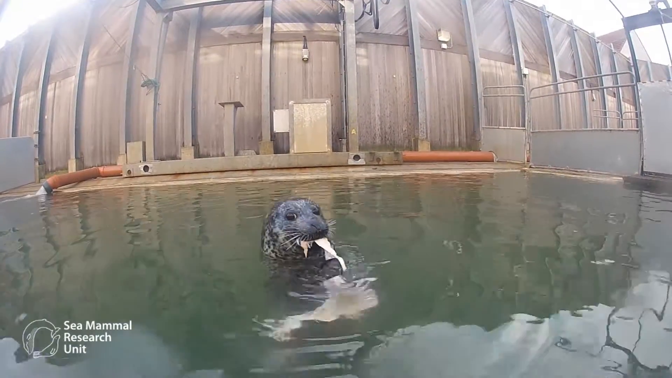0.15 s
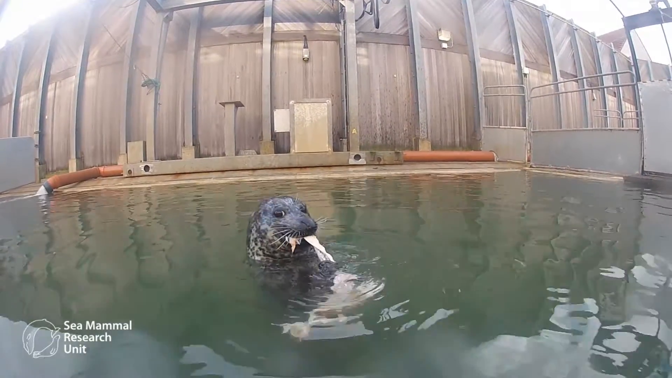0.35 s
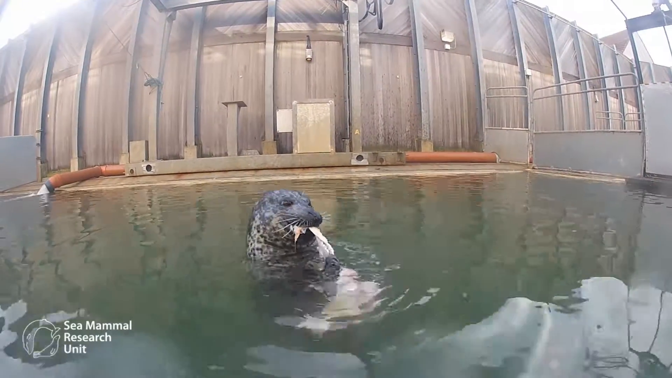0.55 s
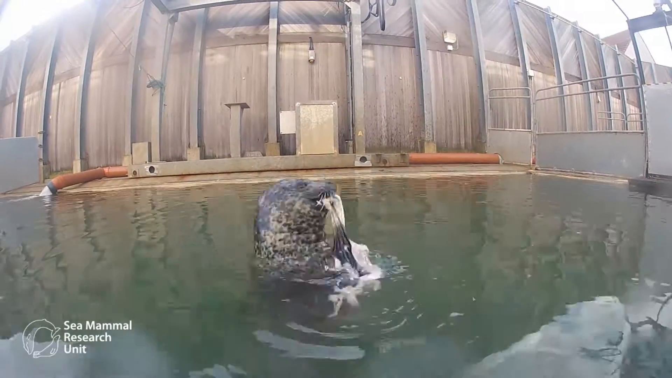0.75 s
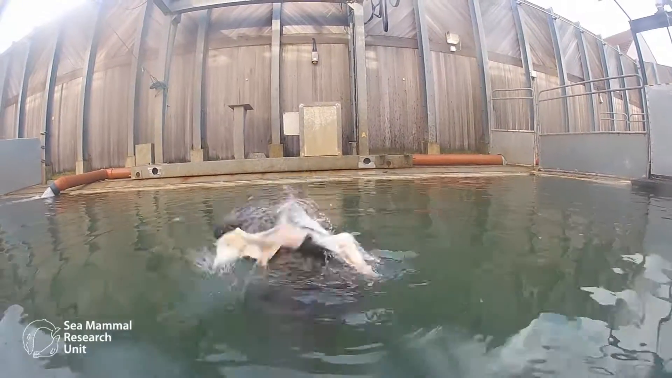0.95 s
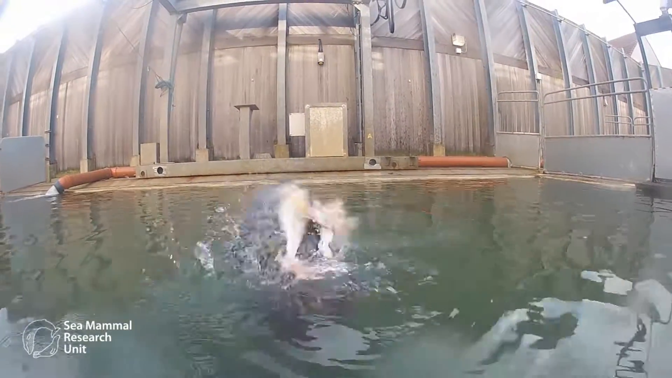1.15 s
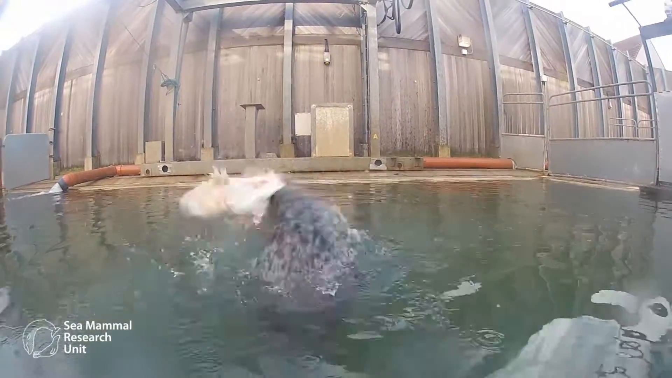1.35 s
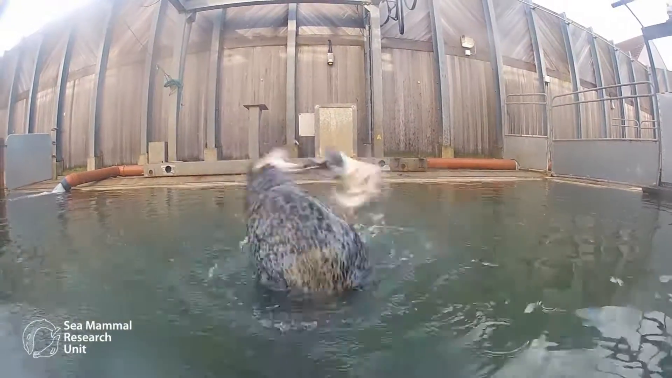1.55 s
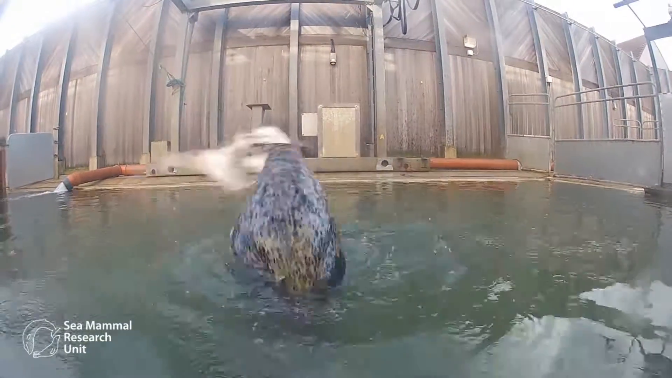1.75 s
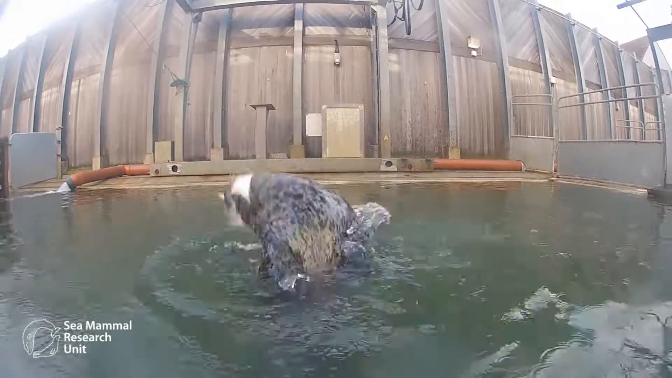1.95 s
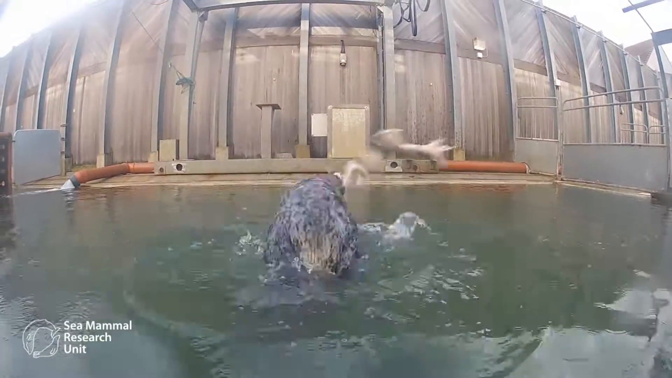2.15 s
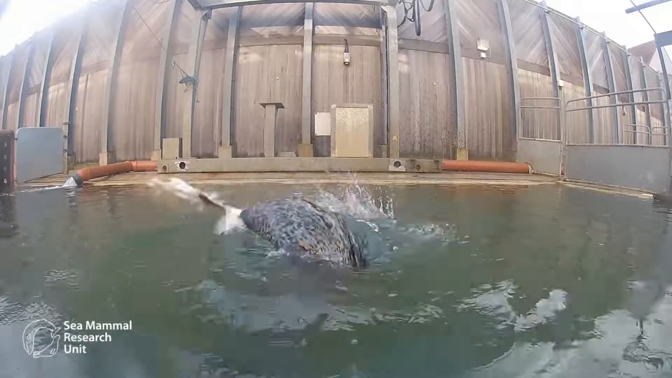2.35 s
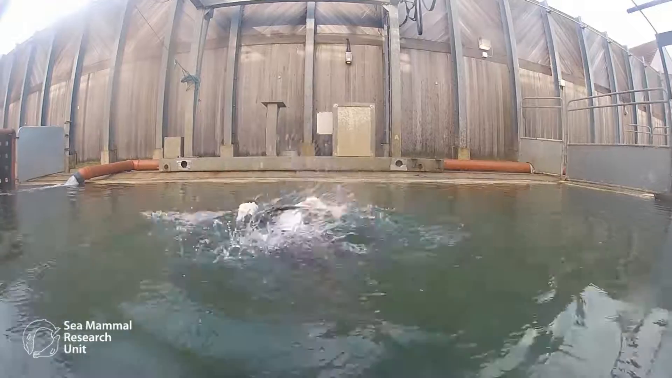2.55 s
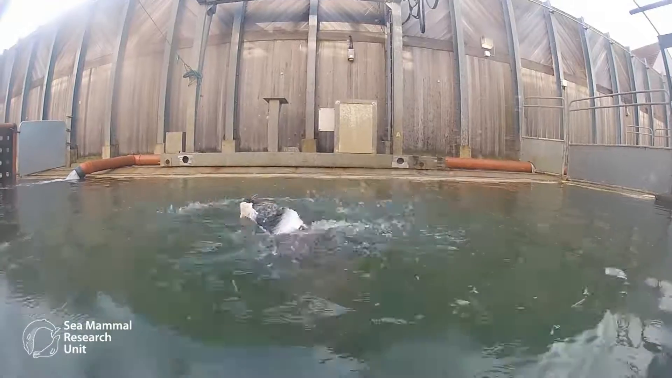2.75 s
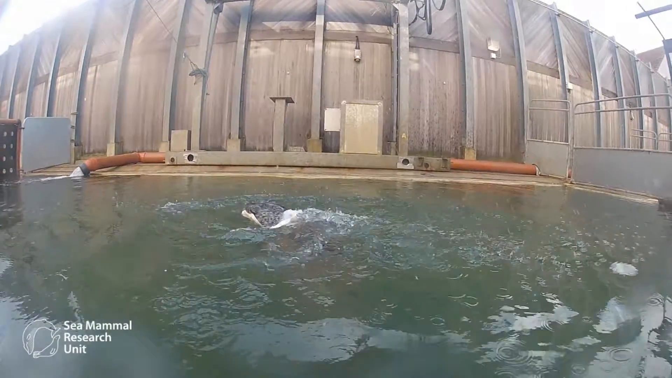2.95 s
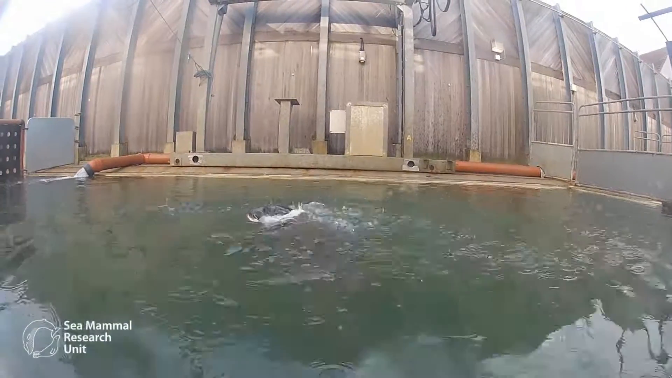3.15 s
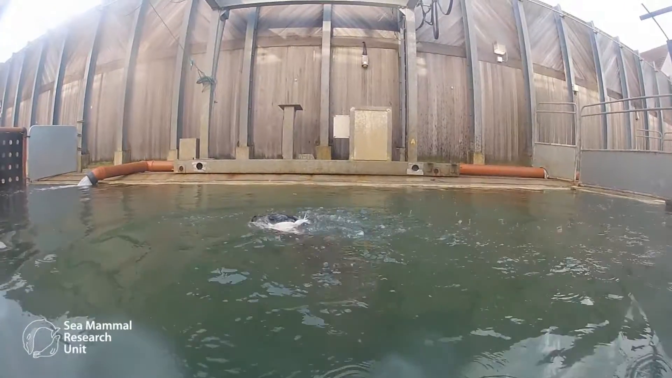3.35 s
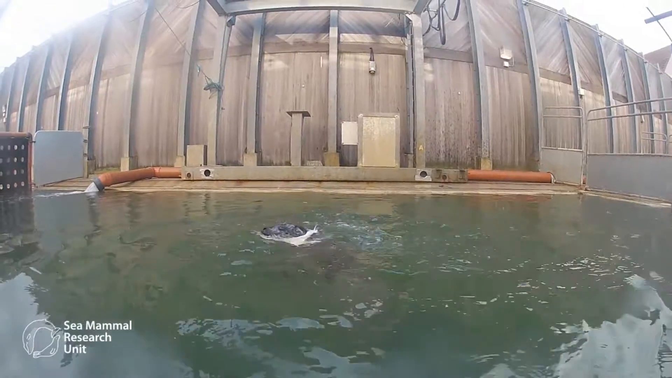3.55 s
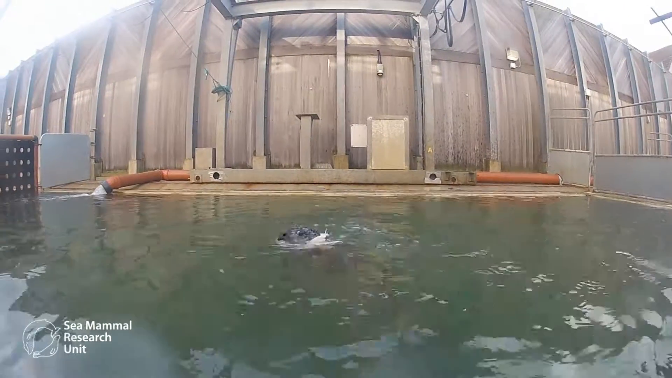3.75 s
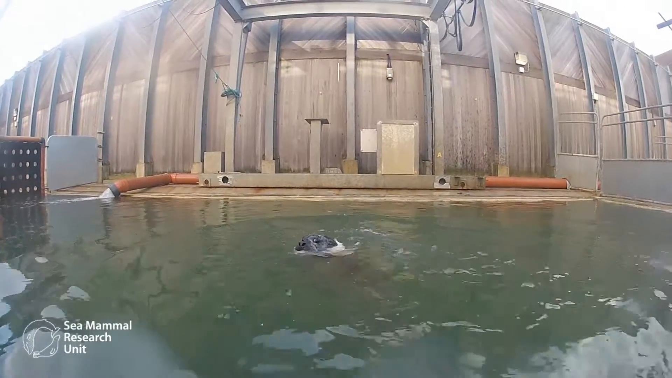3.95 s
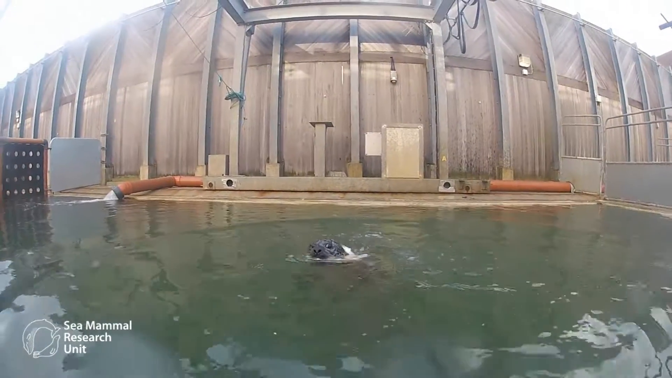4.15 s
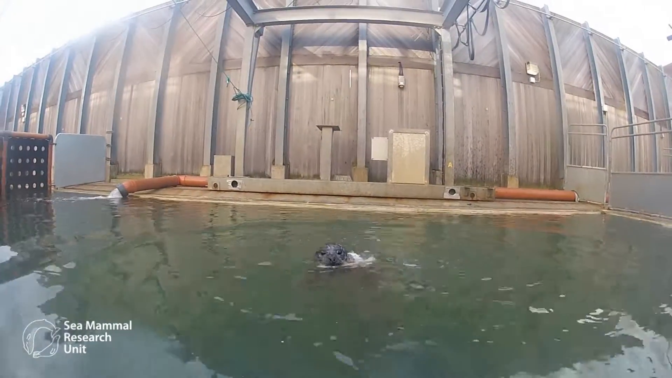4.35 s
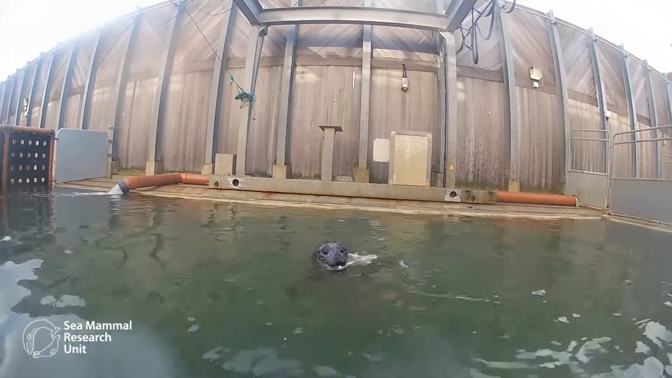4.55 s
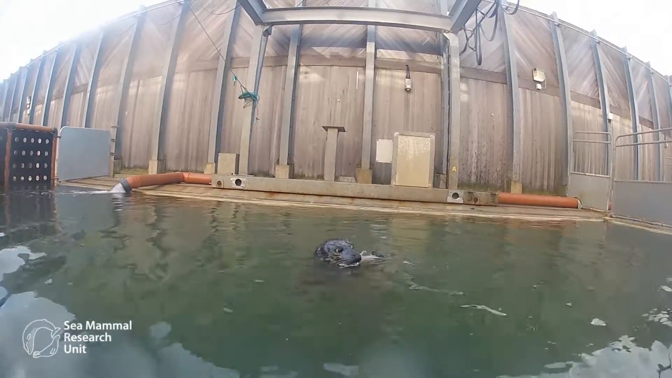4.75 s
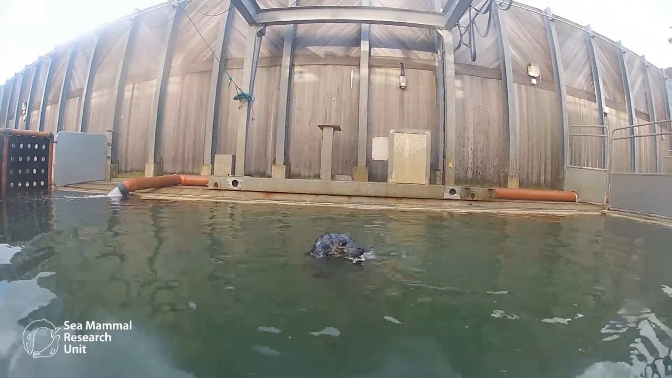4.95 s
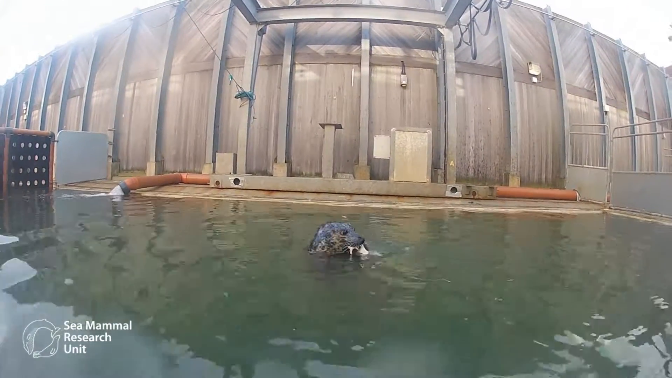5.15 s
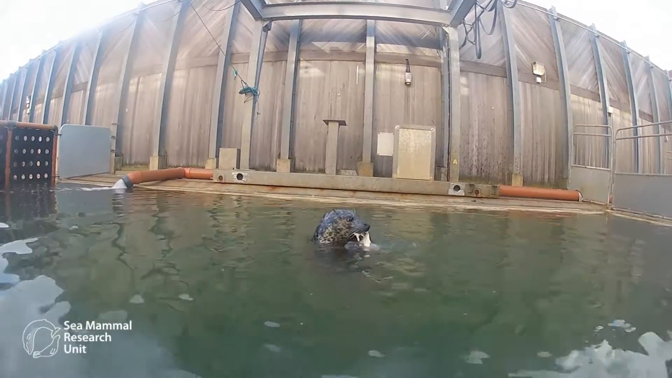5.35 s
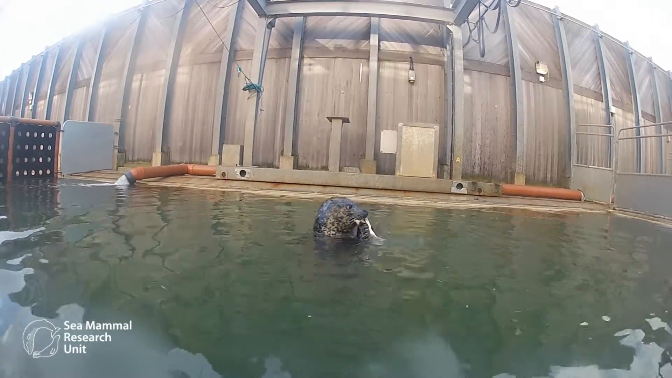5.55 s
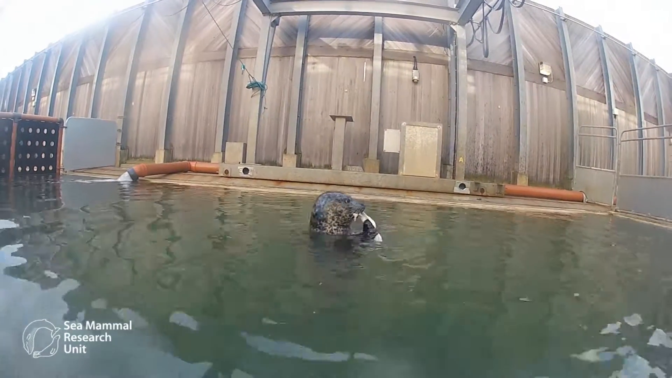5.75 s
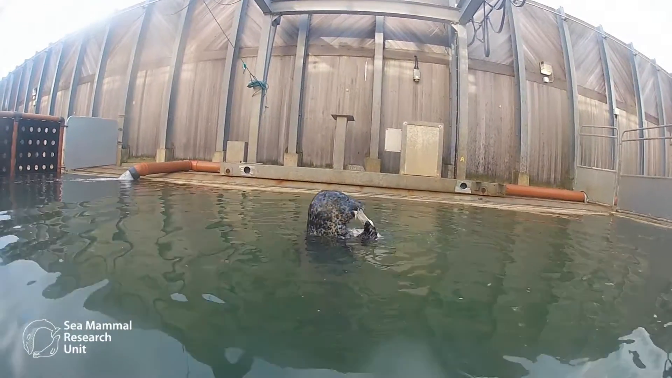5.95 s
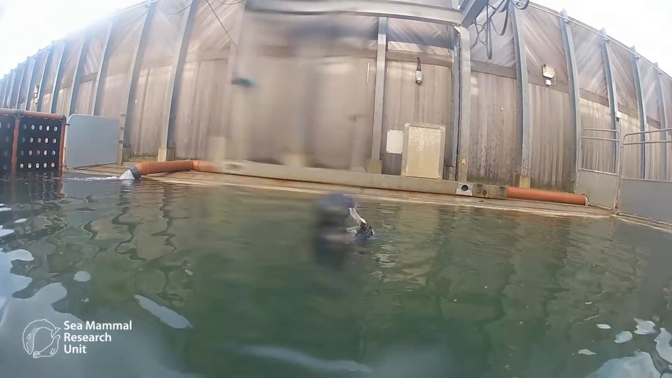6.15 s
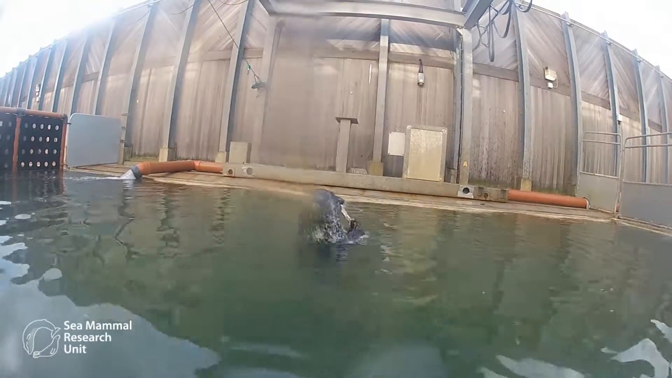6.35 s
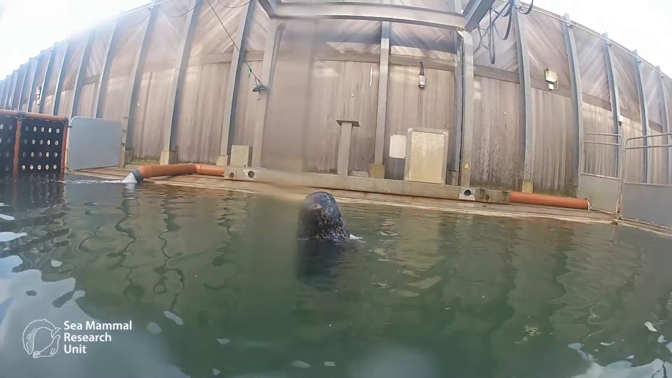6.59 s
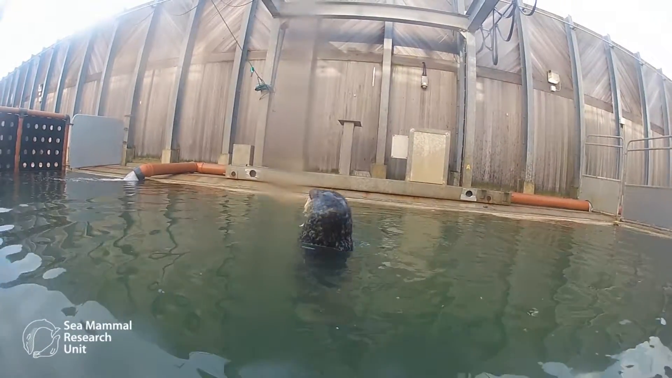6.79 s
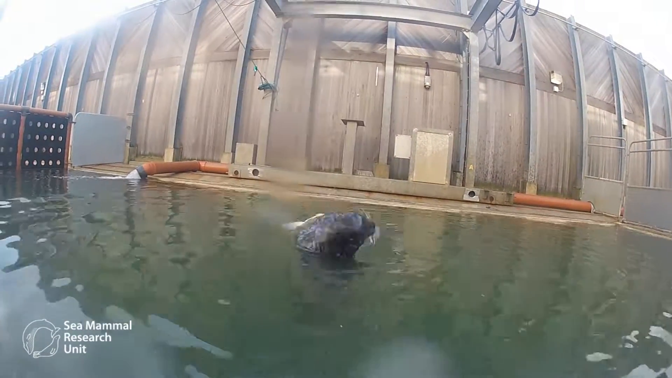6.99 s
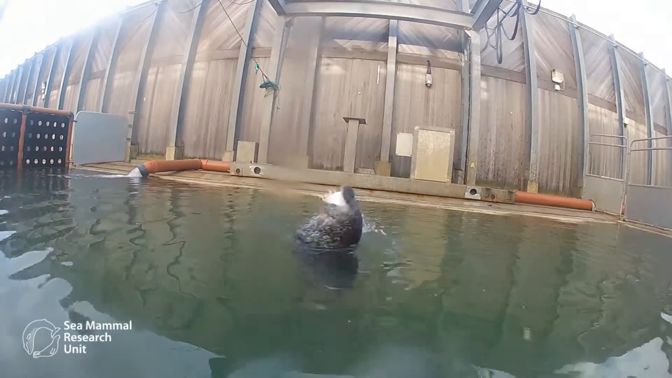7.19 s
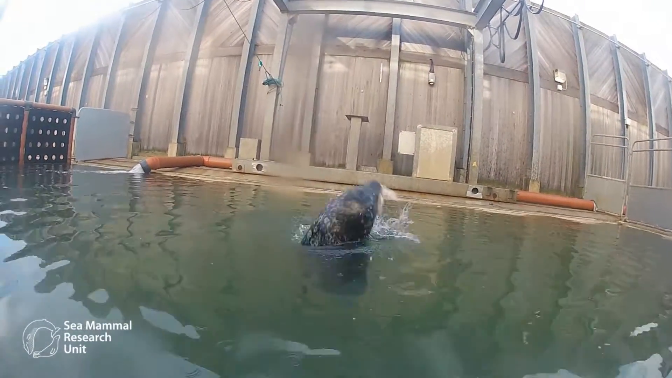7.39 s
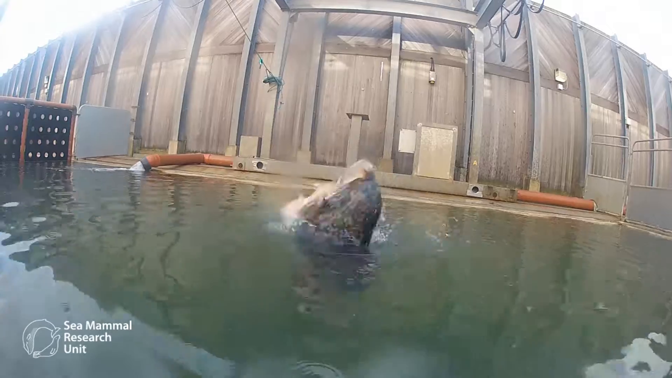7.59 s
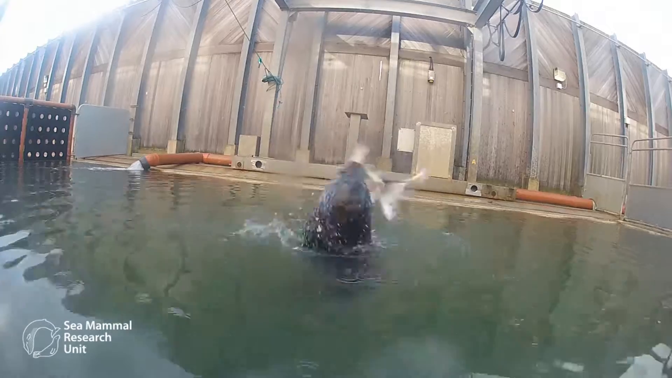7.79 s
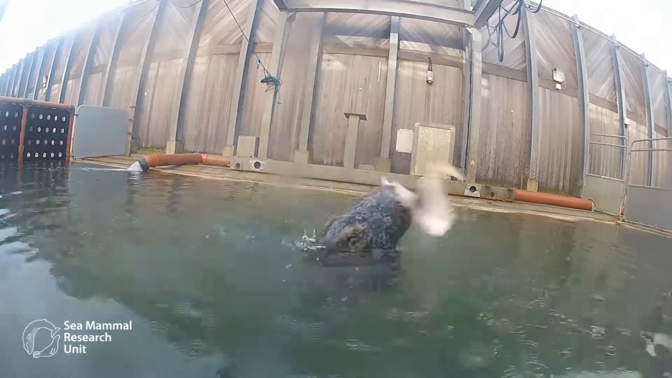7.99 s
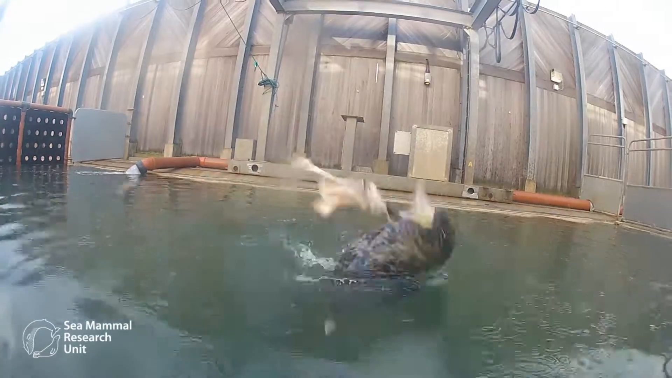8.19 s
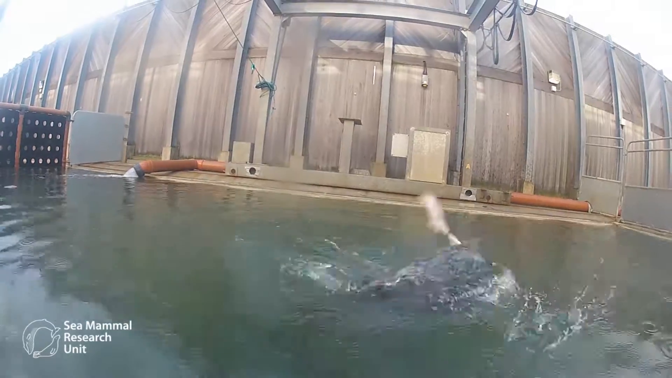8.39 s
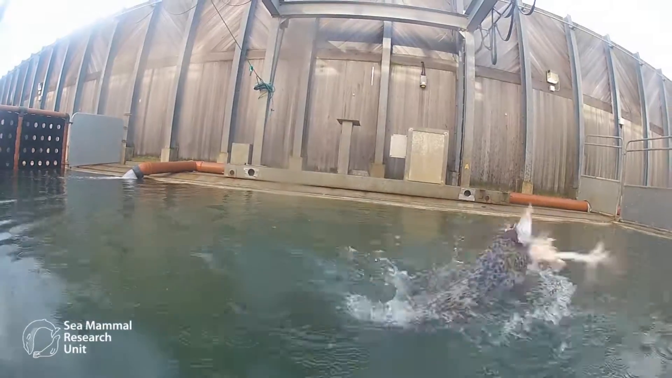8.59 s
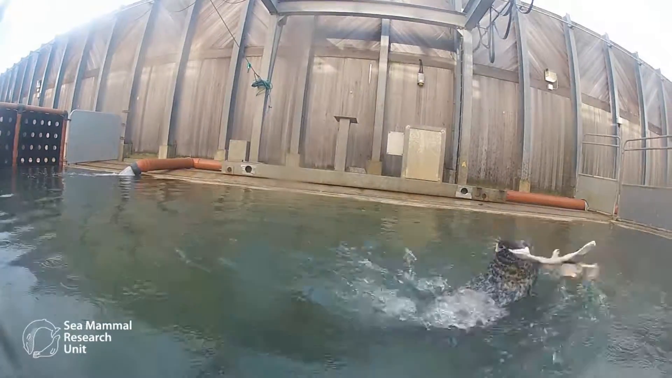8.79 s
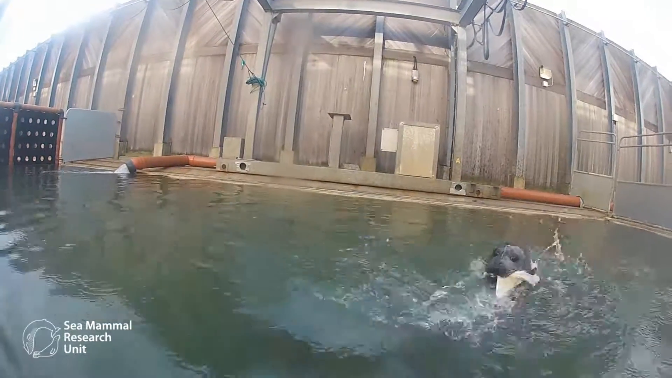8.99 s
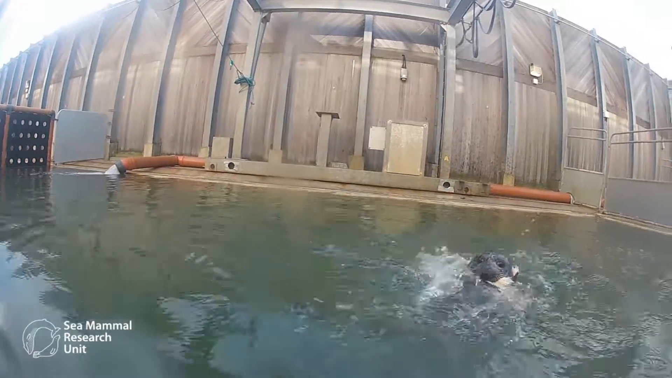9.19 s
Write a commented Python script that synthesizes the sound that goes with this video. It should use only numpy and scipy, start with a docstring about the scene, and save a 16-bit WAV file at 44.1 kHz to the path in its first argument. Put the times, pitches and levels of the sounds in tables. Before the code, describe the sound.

A seal thrashes a fish in an outdoor pool, splashing and gurgling in two bouts, with a trickling inlet, soft thumps and distant gulls.

```python
"""A seal thrashes a fish about in an outdoor pool, heard through a waterproof case just over the water.
Thrashing is swarms of spray ticks and ringing bubbles; gushes and slaps are shaped bursts of spray.
Flung drops rap the case modes; the mount shakes and thumps on one low resonance.
An inlet trickles on as filtered ticks; gulls and a small bird call far off as gliding harmonic tones.
The recorder holds its samples at a low rate, which adds mirrored treble."""
import sys
import numpy as np
from scipy import signal
from scipy.fft import rfft, irfft, next_fast_len
from scipy.io import wavfile
from scipy.ndimage import uniform_filter1d

SR = 44100
rng = np.random.default_rng(int(sys.argv[2]) if len(sys.argv) > 2 else 0)


def dump_mix(stems):
    """Bounce the given channels to the path in sys.argv[1] as a 16-bit WAV at rate SR."""
    frames = np.atleast_2d(stems).T  # one column per channel
    limited = np.clip(frames, -1, 1)  # hard clip at full scale
    pcm = np.round(limited * 32767).astype(np.int16)
    wavfile.write(sys.argv[1], SR, pcm)


N = 407043
T = np.arange(N) / SR


def undb(db):
    """Decibels to amplitude gain."""
    return 10 ** (np.asarray(db) / 20)


def unit(x):
    """Scale to rms 1."""
    return x / np.sqrt(np.mean(x ** 2) + 1e-20)


def add(out, start_s, x):
    """Mix x into out from start_s."""
    i = max(int(start_s * SR), 0)
    out[i:i + len(x)] += x[:max(N - i, 0)]


def colour(x, points, size=2048):
    """Causal minimum-phase filter with the given (frequency [Hz], gain [dB]) outline."""
    hz, db = np.transpose(points)
    gain = undb(np.interp(np.log(np.fft.rfftfreq(size, 1 / SR) + 1), np.log(hz), db))
    # folding the cepstrum gives minimum phase
    cepstrum = irfft(np.log(gain))
    cepstrum[1:size // 2] *= 2
    cepstrum[size // 2 + 1:] = 0
    impulse = irfft(np.exp(rfft(cepstrum)))
    return signal.fftconvolve(x, impulse)[:len(x)]


def band(x, hz, q):
    """One resonance, gain 1 at its centre."""
    b, a = signal.iirpeak(min(hz, SR / 4), max(q, .3), fs=SR)
    return signal.lfilter(b, a, x)


def walk(rate_hz):
    """Slow random curve with a spread near 1: held noise, smoothed twice."""
    k = int(SR / rate_hz)
    steps = np.repeat(rng.standard_normal(N // k + 1), k)
    return np.sqrt(2) * uniform_filter1d(uniform_filter1d(steps, k), k)[:N]


def ticks(size, rate_hz, spread_db):
    """Droplet impacts at random moments: many small, a few large."""
    hit = rng.random(size) < rate_hz / SR
    sign = rng.choice([-1, 1], size)
    return hit * sign * undb(spread_db * np.minimum(rng.exponential(size=size), 4))


def bubbles(low_hz, high_hz, cycles, spread_db, count):
    """Bubbles ring for some cycles and rise in pitch as they near the surface."""
    out = np.zeros(N)
    for when, pitch, life, rank in rng.random((count, 4)):
        hz = low_hz * (high_hz / low_hz) ** pitch
        length_s = cycles * (.5 + life) / hz
        age = np.arange(int(length_s * SR)) / (length_s * SR)
        phase = 2 * np.pi * hz * length_s * (age + 0.172 * age ** 2)
        ring = np.sin(phase) * np.exp(-np.log(100) * age)
        add(out, when * N / SR, ring * undb(spread_db * min(-np.log(1 - rank), 3)))
    return unit(out)


def echo(x, db, t60_s):
    """The walls round the pool return a soft wash: decaying noise, 18 ms late."""
    t = T[:SR]
    tail = rng.standard_normal(len(t)) * np.exp(-np.log(1000) * t / t60_s) * (t > .018)
    return undb(db) * signal.fftconvolve(x, tail / np.linalg.norm(tail))[:N]


# airborne transmission of the case wall: (frequency [Hz], gain [dB])
WALL_RESPONSE = [(200, -5.5), (720, -8.5), (1070, -2), (1400, -10), (1640, -0.5), (2020, -1), (2220, -5),
                 (2430, 2.5), (2850, -2), (3350, -0.5), (3780, 4.5), (4120, -7.5), (4900, -5),
                 (5900, -10.5)]


def through_wall(x):
    """The case wall passes airborne sound unevenly, with peaks and dips."""
    return colour(x, WALL_RESPONSE)


# spectrum of the faint noise that differs between the ears: (frequency [Hz], relative density [dB])
WIDTH_SPECTRUM = [(15, -25), (25, 0), (261, 2.5), (1420, -15.5), (2180, -33.5), (2440, -32.5),
                  (2990, -32.5), (3580, -37.5), (4390, -13.5), (5500, -17), (7150, -57.5), (12100, -120)]


def width():
    """Faint shaped noise, added to one ear and subtracted from the other."""
    return undb(-81) * unit(colour(rng.standard_normal(N), WIDTH_SPECTRUM))


# spectrum of the dull background: (frequency [Hz], relative density [dB])
RUMBLE_SPECTRUM = [(20, -3.5), (35, -2), (60, -2.5), (120, -7.5), (200, -9), (320, -11.5), (500, -17),
                   (800, -23.5), (1500, -45.5)]


def rumble():
    """Low shaped noise whose level drifts a little."""
    noise = unit(colour(rng.standard_normal(N), RUMBLE_SPECTRUM))
    return undb(-59) * noise * undb(0.48 * walk(6))


def calls(notes, harmonics_db):
    """Gliding harmonic notes with a slight random waver in pitch."""
    out = np.zeros(N)
    for start_s, length_s, start_hz, end_hz, db in notes:
        size = int(length_s * SR)
        waver = 0.031 * uniform_filter1d(rng.standard_normal(size), SR // 200)
        hz = np.linspace(start_hz, end_hz, size) * (1 + waver)
        phase = 2 * np.pi * np.cumsum(hz) / SR
        tone = sum(undb(h) * np.sin((k + 1) * phase) for k, h in enumerate(harmonics_db))
        add(out, start_s, undb(db) * unit(tone) * signal.windows.tukey(size, .5))
    return out


# far gull notes: (start [s], length [s], start pitch [Hz], end pitch [Hz], level before wall [dB])
GULL_NOTES = [(.56, 0.074, 1179, 1173, -64.5), (2.86, 0.057, 1192, 1207, -62.5),
              (2.92, 0.058, 1400, 1352, -56), (3.585, 0.0607, 1101, 1163, -61),
              (3.655, 0.0847, 1336, 1356, -52.5), (4.53, 0.0535, 1253, 1303, -63)]


def gulls():
    """Lone gull notes with three harmonics, through the case wall."""
    return through_wall(calls(GULL_NOTES, [-3, -2, -6]))


# each gap is two QUICKEN steps shorter than the last
CACKLE_START_S, CACKLE_GAP_S, CACKLE_QUICKEN_S = 6.06, .122, 0.0027
CACKLE_NOTE_S, CACKLE_HZ, CACKLE_DB, CACKLE_BRIGHTEN_DB = 0.0478, 553.5, -62.5, 2


def cackle():
    """Six like gull notes, ever closer; the third harmonic grows from note to note."""
    out = np.zeros(N)
    for k in range(6):
        start_s = CACKLE_START_S + k * (CACKLE_GAP_S - k * CACKLE_QUICKEN_S)
        note = (start_s, CACKLE_NOTE_S, CACKLE_HZ, CACKLE_HZ, CACKLE_DB)
        out += calls([note], [-12, 0, -11 + k * CACKLE_BRIGHTEN_DB])
    return through_wall(out)


WHISTLE_S, WHISTLE_SAG_HZ = .085, 55
# thin whistles of a small bird: (start [s], start pitch [Hz], level [dB])
WHISTLE_NOTES = [(.76, 4900, -72.5), (3.41, 4760, -71), (4.88, 4750, -74.5), (5.02, 4720, -70),
                 (6.159, 4710, -67.5), (6.33, 4630, -71.5)]


def whistles():
    """Equally long pure tones that sag a little in pitch."""
    notes = [(s, WHISTLE_S, hz, hz - WHISTLE_SAG_HZ, db) for s, hz, db in WHISTLE_NOTES]
    return calls(notes, [0])


def birds():
    """Gulls and a small whistler far off, trailing echoes."""
    song = gulls() + cackle() + whistles()
    return song + echo(song, -4.5, 0.49)


def inlet():
    """Steady trickle: dense droplet ticks through one broad resonance."""
    return undb(-62.0) * unit(through_wall(band(ticks(N, 9000, 1.5), 1950, 0.734)))


SHAKE_DB = -60.5
# spells of harder shaking: (middle [s], half length to 1/e power [s], level [dB])
SHAKE_SPELLS = [(3.2, 0.536, -60), (5.1, 0.54, -54.5), (9.047, 0.13, -55.5)]


def shake():
    """The mount always trembles at its low resonance, harder in spells; powers add."""
    tremble = unit(band(band(rng.standard_normal(N), 78.5, 3.9), 76.66, 2.98))
    power = undb(SHAKE_DB) ** 2
    for middle_s, half_s, db in SHAKE_SPELLS:
        power = power + undb(db) ** 2 * np.exp(-((T - middle_s) / half_s) ** 2)
    return tremble * np.sqrt(power)


THUMP_HZ, THUMP_RISE_S, THUMP_TRIM_DB = 79.95, 0.02154, -4.0
# soft knocks through the mount: (start [s], level before trim [dB])
MOUNT_THUMPS = [(.203, -39.5), (2.991, -42), (3.931, -38), (4.941, -37), (5.445, -42), (5.788, -41.5),
                (6.803, -42.5), (8.784, -38), (9.026, -35)]


def thumps():
    """A nudged mount booms: a low sine that swells and dies away."""
    out, t = np.zeros(N), T[:SR // 3]
    age = t / THUMP_RISE_S
    boom = age ** 2 * np.exp(2 * (1 - age)) * np.sin(2 * np.pi * THUMP_HZ * t)
    for start_s, db in MOUNT_THUMPS:
        add(out, start_s, undb(db + THUMP_TRIM_DB) * boom)
    return out


RAP_TRIM_DB = -19
# modes of the struck case: (nominal frequency [Hz], nominal level [dB], t60 [s])
STRUCK_MODES = [(191, -11, 0.00984), (454, -13.5, 0.00504), (894.6, -2, 0.0177), (1027, -2.5, 0.0326),
                (1222, -4, 0.0104), (1594.7, -0.5, 0.01554), (1751, 3.5, 0.00835), (2027, 0, 0.0189),
                (2350, -5, 0.0106), (2413, -4.5, 0.024), (3346, -4, 0.006), (3540, 3, 0.0117),
                (3690, -3.5, 0.0184), (5020, -6, 0.0089), (5270, -3, 0.0044)]
# drops landing on the case; weight drives the low modes:
# (time [s], level before trim [dB], favoured frequency [Hz], weight [dB])
CASE_RAPS = [(1.7628, -32.5, 1966, 1), (1.773, -37.5, 1666, 5), (1.8499, -34, 1990, -6.5),
             (2.2713, -32.5, 1910, 1), (3.892, -39, 1790, -7.5), (8.0155, -30.5, 2080, -0.5),
             (8.197, -38, 2060, 2.5), (8.254, -34, 1600, 12), (8.3138, -35.5, 1620, 18),
             (8.3989, -17.5, 1951, 0), (8.4073, -17, 2950, -5.5), (8.434, -28, 2000, 2.5),
             (8.6949, -15.5, 1934, 3), (8.705, -18, 2400, 4), (8.7158, -8, 1603, -4.5)]


def raps():
    """A drop strikes the case, then spreads for a moment; where it lands decides which modes speak."""
    out, t = np.zeros(N), T[:SR // 25]
    hz, mode_db, t60_s = np.transpose(STRUCK_MODES)[:, :, None]
    # neighbouring modes swing in opposite directions, so the rap takes a moment to build
    sign = (-1) ** np.arange(len(hz))[:, None]
    for start_s, db, centre_hz, weight_db in CASE_RAPS:
        level_chance, pitch_chance = rng.standard_normal((2, len(hz), 1))
        favoured_db = 9.96 * np.exp(-(np.log2(hz / centre_hz) / 0.212) ** 2)
        low_db = weight_db / (1 + (hz / 1300) ** 8)
        gain = sign * undb(mode_db + 1.48 * level_chance + favoured_db + low_db)
        swing = np.sin(2 * np.pi * hz * (1 + 0.0072 * pitch_chance) * t)
        ring = (gain * swing * np.exp(-np.log(1000) * t / t60_s)).sum(0)
        # first contact: one sharp snap
        snap = np.sin(2 * np.pi * 2600 * t) * np.exp(-t / 0.000084)
        # the spreading edge crackles for a few milliseconds
        splat = band(rng.standard_normal(len(t)) * np.exp(-(t / .0034) ** 2), 2400, .55)
        contact = through_wall(undb(-0.5) * unit(splat) + unit(snap))
        rap = unit(unit(ring) + undb(-3.5) * unit(contact))
        add(out, start_s, undb(db + RAP_TRIM_DB) * rap)
    return out


PLOP_S, PLOP_TRIM_DB = 0.0326, 8.5
# large bubbles that stand out: (start [s], level before trim [dB], start pitch [Hz])
LARGE_PLOPS = [(.789, -64, 1000), (.841, -62, 1036), (1.07, -58, 807), (1.18, -60.5, 1029),
               (1.476, -55, 1014), (2.248, -56, 760), (2.741, -61, 1045), (2.822, -61.5, 1062),
               (3.068, -60.5, 1063), (7.524, -64, 968), (7.729, -50, 989), (9.065, -57, 974)]


def plops():
    """A pocket of trapped air swells, rings and rises in pitch with a wobble."""
    out = np.zeros(N)
    age = np.linspace(0, 1, int(PLOP_S * SR))
    envelope = (age / 0.164) * np.exp(1 - age / 0.1384) * (1 - age ** 4)
    for start_s, db, hz in LARGE_PLOPS:
        wobble = 0.26 * uniform_filter1d(rng.standard_normal(len(age)), SR // 400)
        phase = 2 * np.pi * np.cumsum(hz * (1 + 0.192 * age + wobble)) / SR
        add(out, start_s, undb(db + PLOP_TRIM_DB) * np.sin(phase) * envelope)
    return out


SLAP_RISE_S, SLAP_TRIM_DB = 0.00129, -16.5
# single slaps on the water: (time [s], level before trim [dB], centre frequency [Hz])
WATER_SLAPS = [(.263, -38.5, 3736), (.829, -43, 3380), (1.04, -37.5, 3244), (1.094, -38.5, 3636),
               (1.133, -37.5, 3790), (1.582, -36, 2880), (1.6452, -29, 3680), (1.697, -30.5, 3640),
               (1.968, -31, 3750), (2.026, -31.5, 3574), (2.09, -39, 2900), (2.277, -30, 3675),
               (2.31, -39.5, 3150), (2.515, -30, 3908), (2.642, -37, 3135), (2.7996, -35.5, 2670),
               (2.86, -37.5, 3670), (7.132, -39.5, 3645), (7.947, -35.5, 3737), (8.015, -31, 3708),
               (8.339, -40, 3567), (8.372, -37, 3800), (8.487, -40, 1630)]


def slaps():
    """One short burst of spray; each slap traps a small bubble that pings along with it."""
    out, t = np.zeros(N), T[:SR // 25]
    age = t / SLAP_RISE_S
    envelope = age * np.exp(-age)
    for time_s, db, hz in WATER_SLAPS:
        burst = band(rng.standard_normal(len(t)) * envelope, hz, 1.95)
        ping = np.sin(2 * np.pi * hz * t) * envelope
        slap = through_wall(unit(burst) + undb(-3.5) * unit(ping))
        add(out, time_s - .001, undb(db + SLAP_TRIM_DB) * unit(slap))
    return out


# water thrown by body and fish:
# (middle [s], level [dB], half length as Gaussian sigma [s], centre frequency [Hz])
WATER_GUSHES = [(1.095, -53, 0.0091, 650), (1.178, -49.5, 0.0288, 2980), (1.304, -50, 0.0089, 4500),
                (1.362, -46.5, 0.0237, 2970), (1.481, -47, 0.011, 3040), (1.643, -46, 0.0122, 3020),
                (1.81, -44, 0.0063, 4550), (2.096, -47.5, 0.00827, 3340), (2.277, -43.5, 0.00505, 1950),
                (2.358, -45.5, .009, 1820), (2.433, -51, .0085, 4700), (2.545, -37.5, .005, 4000),
                (2.555, -39, 0.0131, 3180), (4.341, -58.5, 0.0138, 1300), (7.15, -55, 0.0262, 2520),
                (7.706, -42.5, .007, 3447), (7.884, -47, 0.0203, 3200), (8.025, -41.5, 0.0145, 2700),
                (8.085, -53, .03, 680), (8.428, -42, 0.0056, 1880), (8.561, -32, 0.00485, 3410),
                (9.111, -50, 0.0364, 1790)]


def gushes():
    """Sheets of water swell and fall back: dense ticks under a bell-shaped envelope."""
    out = np.zeros(N)
    for middle_s, db, half_s, hz in WATER_GUSHES:
        t = np.arange(-3 * half_s, 3 * half_s, 1 / SR)
        spray = unit(through_wall(band(ticks(len(t), 5000, 3.47), hz, 1.37)))
        add(out, middle_s + t[0], undb(db) * spray * np.exp(-.5 * (t / half_s) ** 2))
    return out


def droplets(chance):
    """Flung drops fall back as tiny slaps, each a short burst of fizz."""
    age = T[:SR // 50] / 0.000844
    falls = np.abs(ticks(N, 70, 2.23)) * (rng.random(N) < chance)
    envelope = signal.fftconvolve(falls, age * np.exp(-age))[:N]
    return unit(through_wall(band(envelope * rng.standard_normal(N), 3210, 1.0)))


# a bout drops back when the seal stops; part of it lingers as the foam settles
BOUT_ATTACK_S, BOUT_RELEASE_S, FOAM_DB, FOAM_DECAY_S = 0.044, 0.074, -2.5, 0.63
# bouts of churning, from a nudge of the fish to a full thrash:
# (start [s], length [s], spray gain [dB], large-bubble gain [dB])
THRASH_BOUTS = [(0.747, 0.09, -61.5, -64), (1.103, 0.977, -54.5, -64.5), (2.228, 0.456, -54, -58.5),
                (4.468, 0.105, -62, -61), (6.031, 0.51, -68.5, -66.5), (6.87, 0.91, -61.5, -67.5),
                (7.694, 0.418, -55.5, -59), (8.18, 1.021, -55, -55.5)]


def stirring():
    """Gains of spray and large bubbles: bouts build, hold and settle, and their powers add."""
    power = np.zeros((2, N))
    for start_s, length_s, spray_db, bubble_db in THRASH_BOUTS:
        since_s = np.maximum(T - start_s - length_s, 0)
        foam = undb(FOAM_DB) * np.exp(-since_s / FOAM_DECAY_S)
        settle = np.maximum(np.exp(-since_s / BOUT_RELEASE_S), foam)
        envelope = np.clip((T - start_s) / BOUT_ATTACK_S, 0, 1) * settle
        power += (undb([[spray_db], [bubble_db]]) * envelope) ** 2
    return np.sqrt(power)


def churn():
    """Spray and fine bubbles follow the thrashing; big bubbles gurgle beneath."""
    spray_gain, bubble_gain = stirring()
    # the pool laps a little even when the seal is still
    spray_gain = np.hypot(spray_gain, undb(-69.5))
    bubble_gain = np.hypot(bubble_gain, undb(-79.5))
    effort = spray_gain / spray_gain.max()

    spray = unit(ticks(N, 2500, 2.0)) + undb(-6.5) * bubbles(1702, 4362, 20.5, 3.36, count=4500)
    spray = unit(through_wall(band(spray, 3410, 0.995)))
    # hard thrashing makes the spray ragged and throws lone drops
    ragged = undb(2.71 * np.sqrt(effort) * walk(45))
    high = spray_gain * (undb(-0.5) * spray * ragged + undb(-8.0) * droplets(effort))

    gurgle = unit(through_wall(bubbles(677, 1237, 6.77, 3.1, count=1600)))
    slosh = unit(through_wall(band(ticks(N, 1500, 2.5), 730, 0.69)))
    # air is gulped under in lumps
    lumps = undb(2 * walk(16))
    low = (undb(-6.5) * gurgle + undb(-9) * slosh) * bubble_gain * lumps
    return high + low


def scene():
    """Nearly mono; only a faint shaped noise differs between the ears."""
    water = inlet() + plops() + slaps() + gushes() + churn()
    water = water + echo(water, -12, 0.188)
    mid = rumble() + birds() + shake() + thumps() + raps() + water
    side = width()
    return np.array([mid + side, mid - side])


HOLD_HZ, TOP_HZ = 12000, 15300


def record(dry):
    """Sample holding at a low rate mirrors the sound into the treble as a glassy sheen."""
    narrow = signal.sosfiltfilt(signal.butter(14, 5850, fs=SR, output="sos"), dry)
    # first pair of images about the hold rate
    mirrored = narrow * (1 + 2 * np.cos(2 * np.pi * HOLD_HZ * T))
    size = next_fast_len(N, True)
    hold_gain = np.sinc(np.fft.rfftfreq(size, 1 / SR) / HOLD_HZ)
    held = irfft(rfft(mirrored, size) * hold_gain, size)[:, :N]
    return signal.sosfilt(signal.ellip(10, .2, 80, TOP_HZ, fs=SR, output="sos"), held)


dry = scene()
out = record(dry)
dump_mix(out)
```